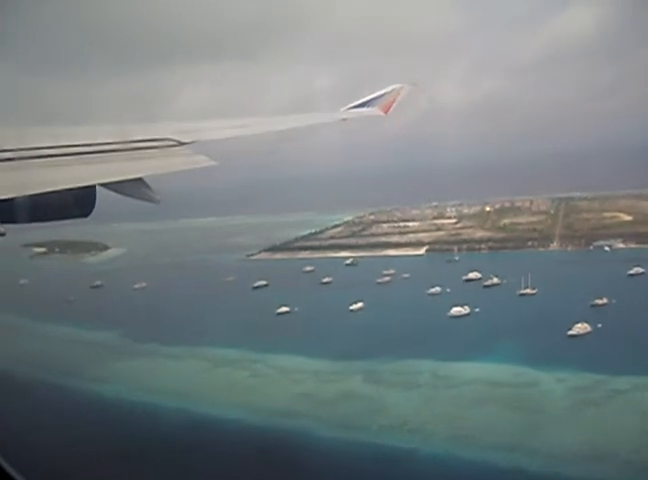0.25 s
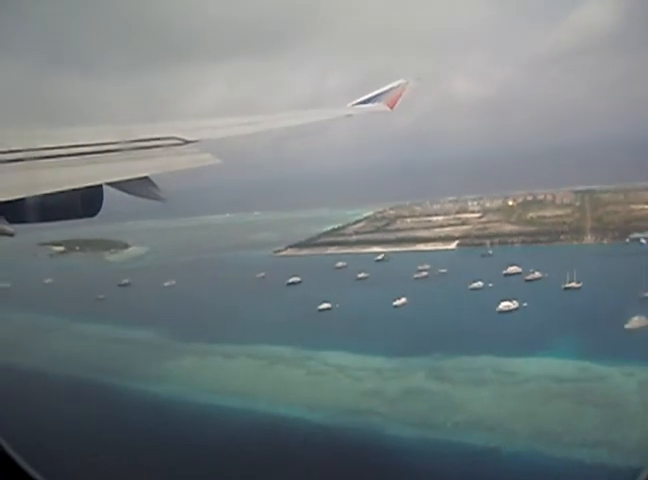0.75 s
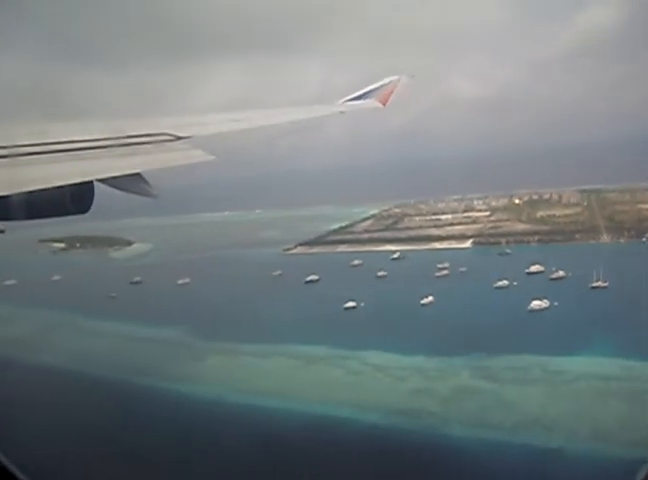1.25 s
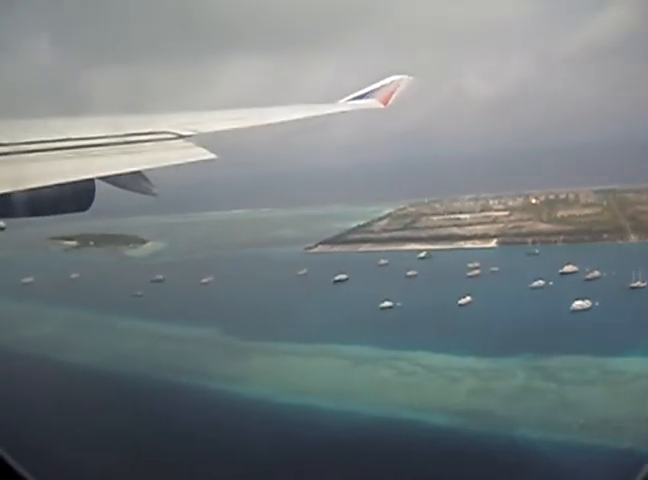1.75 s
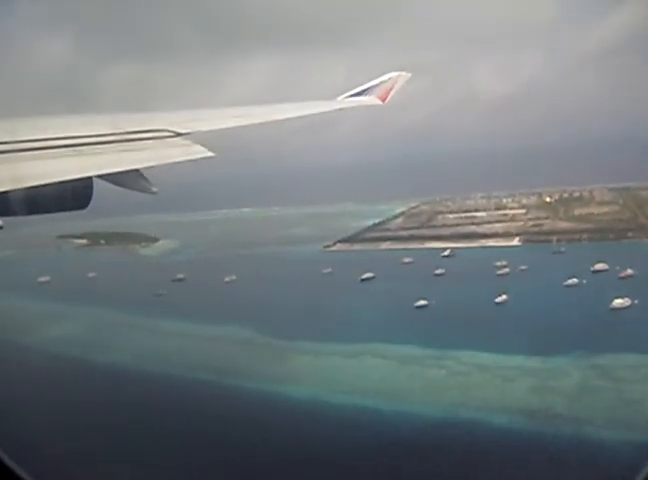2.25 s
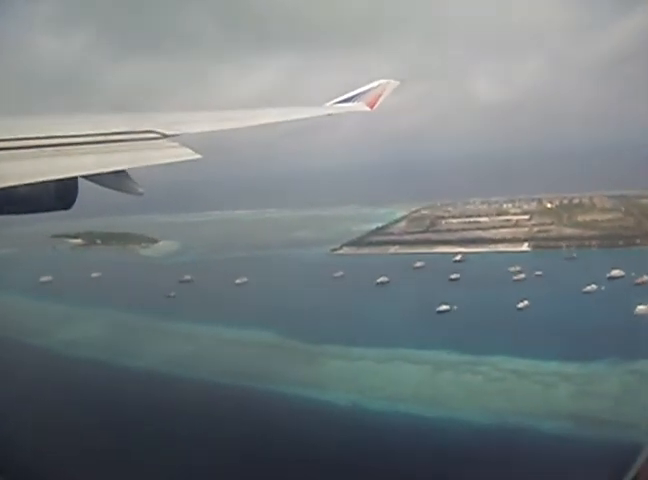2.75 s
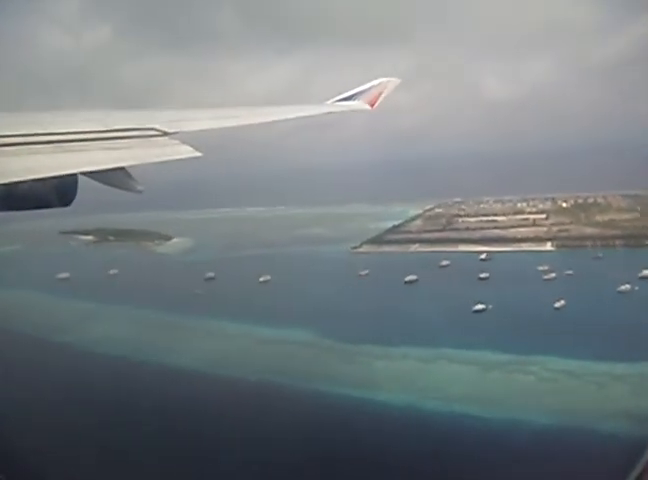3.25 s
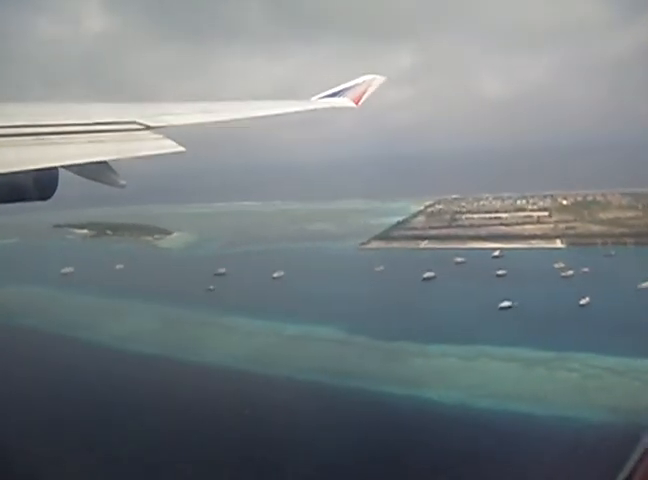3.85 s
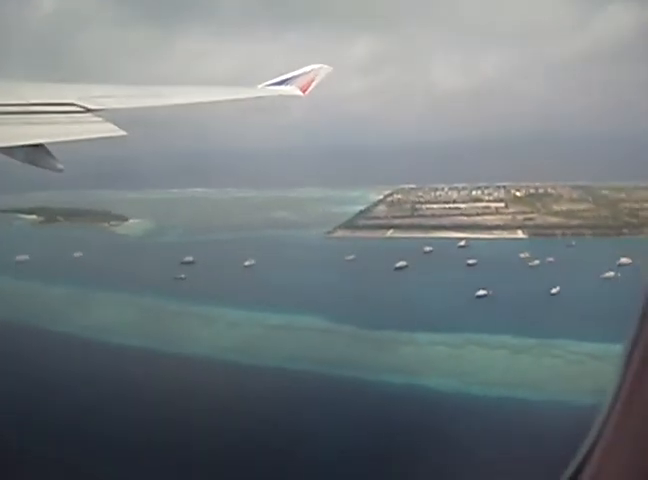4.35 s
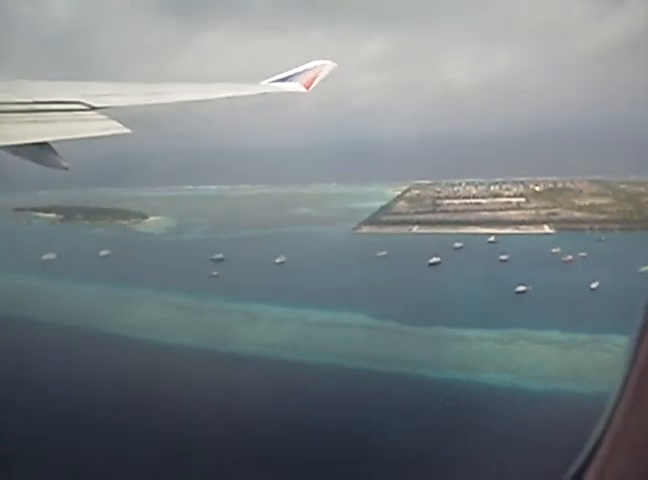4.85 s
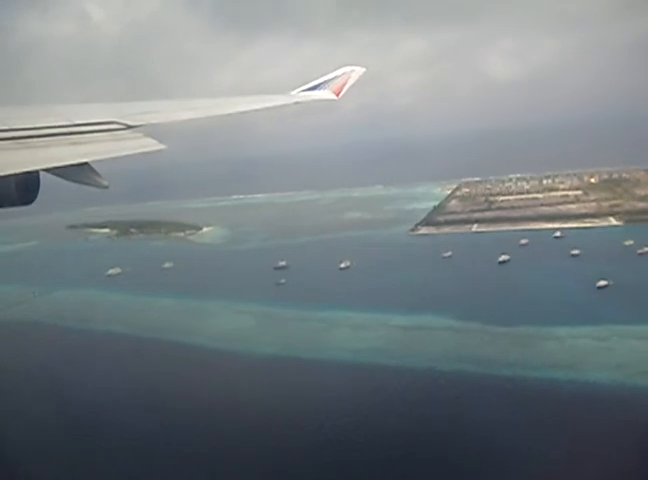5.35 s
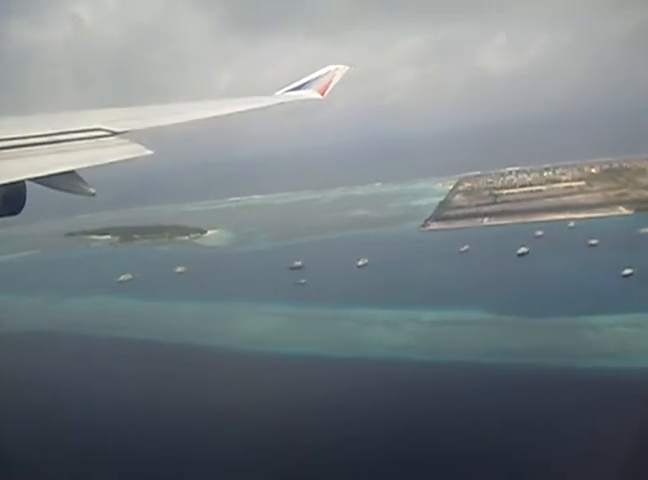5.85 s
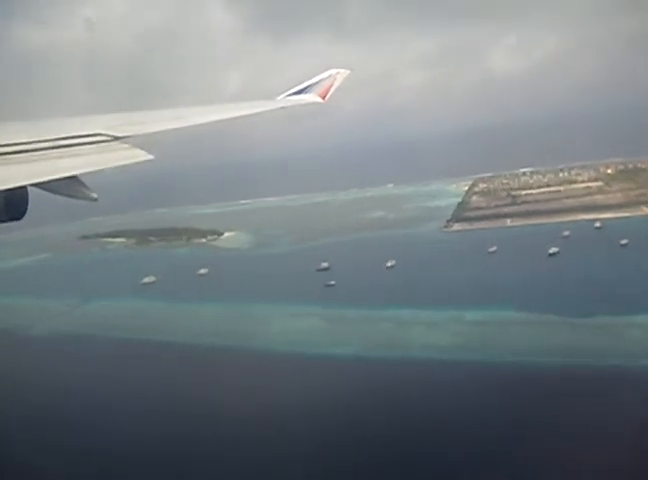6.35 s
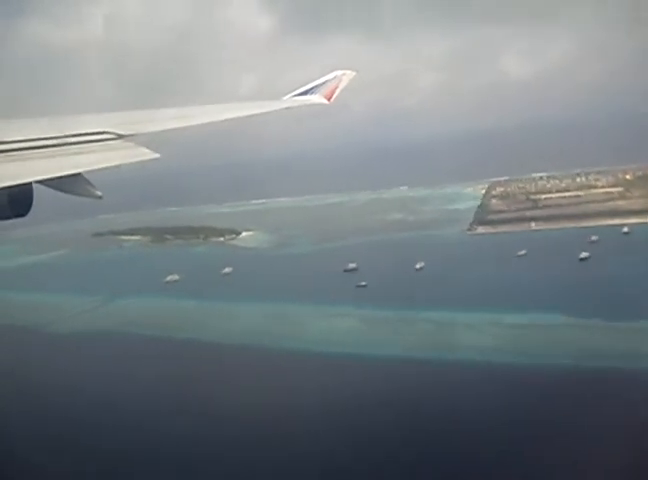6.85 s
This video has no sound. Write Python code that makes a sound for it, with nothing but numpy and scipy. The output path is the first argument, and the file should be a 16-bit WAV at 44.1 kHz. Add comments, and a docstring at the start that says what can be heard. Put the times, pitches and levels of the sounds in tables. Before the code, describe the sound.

The sound is a continuous airliner cabin roar heard beside a window while climbing over water, lasting about 7 seconds. Deep exhaust rumble and boomy wall panel vibration dominate, mostly below 200 Hz, with duller rushing air around 300 Hz and slight slow random swells but no overall change. Faint wavering engine tones are buried within it, and a quiet vent hiss sits far above. From 0 to 0.2 s a small camera motor whirs, with little ringing knocks at about 0.15, 0.18 and 0.2 s; it stops quickly, followed near 0.3 s by a weak knock and soft treble puff. Afterwards thin gritty hiss flutters with the rumble, and faint dry ticks repeat about eleven times a second. Sharper ticks stand out irregularly, for example near 1.0, 1.2, 3.2, 3.5, 4.4, 5.3 and 6.2 s. The roar is still going at the end.

```python
"""Airliner cabin on climb-out

Close to a window, jet roar booms through the fuselage, air rushes along the skin and out of the vents (shaped
noise), and engine tones waver faintly (narrow noise bands). A small camera motor whirs and stops at the start
(fading noise and decaying rings). Thin treble grit rises with the slope of the roar (modulated noise), with
sharper ticks on a steady beat and louder ones at listed times (filtered impulses)."""
import sys
import numpy as np
from scipy import signal
from scipy.fft import rfft, irfft, next_fast_len
from scipy.io import wavfile
from scipy.ndimage import uniform_filter1d, minimum_filter1d, map_coordinates

SR = 44100
rng = np.random.default_rng(int(sys.argv[2]) if len(sys.argv) > 2 else 0)


def put_to_file(sound):
    """Save the sound as 16-bit audio at rate SR, in the file named by the first command-line argument."""
    columns = np.atleast_2d(sound).T  # one column per channel
    safe = np.clip(columns, -1, 1)
    whole_steps = np.round(safe * 32767)
    wavfile.write(sys.argv[1], SR, whole_steps.astype(np.int16))


N = 312072

# In every spectrum only the shape counts: the noise is brought to rms 1 afterwards.
# Exhaust through the airframe: pitch_hz, relative level_db
EXHAUST_SPECTRUM = [(9, -54), (20, -22), (30, -14), (42, -8), (54, -2.5), (65, -2.5), (80, -2.5), (100, 1),
                    (130, -31.5), (220, -120)]
# Cabin wall panels: pitch_hz, relative level_db
PANEL_SPECTRUM = [(53, -16.5), (90, -8), (124, 1), (184, 0.5), (270, -11), (350, -36), (590, -120)]
# Boundary layer on the skin: pitch_hz, relative level_db
SKIN_FLOW_SPECTRUM = [(150, -39.5), (250, -5), (313, 1), (356, -7.5), (389, -6), (536, -16), (698, -21.5),
                      (775, -21.5), (1130, -33), (1500, -37.5), (1700, -52), (2210, -74.5), (3740, -120)]
# Overhead air vents: pitch_hz, relative level_db
VENT_SPECTRUM = [(940, -29.5), (1600, -4), (1760, -3.5), (1990, 0.5), (2350, -6.5), (2580, -5),
                 (3070, -10.5), (3670, -9), (5000, -19.5), (6500, -36.5), (11000, -120)]
# Engine tone centres: pitch_hz
ENGINE_TONE_HZ = [76, 116, 387, 770, 1065, 1300, 1471, 2031, 4172, 7853]
# Engine tone bands, one per centre: full width_hz at half amplitude, rms level_db
ENGINE_TONE_BANDS = [(12, -29), (13.9, -28.5), (20.2, -42.5), (40, -57.5), (10, -67.5), (10, -74),
                     (14, -67), (8, -73.5), (6, -81), (6, -84.5)]
# Gear noise through the camera body: pitch_hz, relative level_db
GEAR_SPECTRUM = [(900, -65), (1350, -11), (1780, -4), (2130, -3.5), (2500, -11.5), (2950, -11), (3270, -6),
                 (3700, -12), (4250, -14), (4750, -11), (6000, -15.5), (6600, -20), (7100, -15),
                 (11000, -38)]
# Upper resonances of the camera body: pitch_hz, half_width_hz, relative level_db
BODY_RESONANCES = [(2210, 150, -4), (3250, 250, 0), (4000, 250, -2), (4550, 180, -11)]
# Motor knocks: start_s, level_db, t60_s, ring pitch_hz, upper rings' level_db, phase step_rad per sample
KNOCKS = [(.151, -30, .028, 1770, -1, .03), (.175, -30, .04, 1850, -6, .04),
          (.203, -38, .08, 1870, -8, .02), (.32, -45, .06, 2400, -9, .25)]
# Treble grit and ticks: pitch_hz, relative level_db
GRIT_SPECTRUM = [(1200, -120), (2000, -7), (4000, 1), (6000, 1), (8000, 0), (10000, -2.5), (10800, -6),
                 (11400, -13.5), (12000, -26), (12300, -120)]
# The loudest ticks: start_s, impulse level_db
LOUD_TICKS = [(.3173, -38), (.5944, -37), (.9638, -32), (.9945, -37), (1.2265, -33.5), (1.6102, -36),
              (2.9953, -37), (3.0876, -36), (3.18, -34.5), (3.5494, -33), (3.9186, -35), (4.021, -39),
              (4.3802, -33), (4.4541, -40), (4.5649, -39), (5.3036, -34), (5.5806, -35), (6.227, -31.5),
              (6.4117, -35)]

EXHAUST_DB, PANEL_DB, SKIN_FLOW_DB = -24, -19.5, -29.5  # middle levels of the three ranges of the roar
SWELL_DB, SWELL_PER_S = 0.75, 1.573  # depth and pace of their slow random swells
VENT_DB, GRIT_DB = -57.5, -61.5
MOTOR_DB, SAG_DB_PER_S = -45.5, 20  # level at first, steady fall throughout
MOTOR_OFF_S, RUNDOWN_DB_PER_S = .195, 330  # switch-off, extra fall after it
PUFF_S, PUFF_WIDE_S, PUFF_DB = .312, 0.015, -54  # treble puff: centre, standard deviation, peak of its envelope
BEAT_S, FIRST_BEAT_S = .092336, .0402  # period and first of the faint ticks
BEAT_DB, BEAT_SPREAD_DB = -44, 2  # their usual impulse level and its scatter
FLICKER_DB, FLICKER_PER_S = .7, 36  # random flicker of the treble hiss
TOP_HZ = 12300  # band limit of the whole sound
CEILING_DB = -5.5  # limiter threshold


def amp(db):
    """Level law: decibels to amplitude gain."""
    return 10 ** (np.asarray(db) / 20)


def unit(x):
    """Power normalisation: scale to rms 1."""
    return x / np.sqrt(np.mean(x ** 2) + 1e-20)


def wobble(rate):
    """Spline interpolation: a smooth random curve with rate knots a second (4000 at most)."""
    knots = rng.standard_normal(int(N * 4000 / SR) + 4)
    return map_coordinates(knots, [np.arange(N) * min(rate, 4000) / SR])


def filtered(x, response):
    """Linear filtering: multiply the spectrum by a response of frequency."""
    m = next_fast_len(N + SR // 2)
    hz = np.fft.rfftfreq(m, 1 / SR)
    return irfft(rfft(x, m) * response(hz), m)[:N]


def coloured(x, spectrum):
    """Spectral shaping: interpolate the level in decibels along a log-frequency axis."""
    f, db = np.transpose(spectrum)
    return filtered(x, lambda hz: amp(np.interp(np.log(hz + 1), np.log(f + 1), db)))


def noise(spectrum, patchy_db):
    """Modulated noise: random gain patches in time and frequency, then a spectral shape, at rms 1."""
    cells = signal.stft(rng.standard_normal(N + 512), nperseg=512)[2]
    field = rng.standard_normal(cells.shape)
    field = uniform_filter1d(field, size=5, axis=0)  # along frequency
    field = uniform_filter1d(field, size=12, axis=1)  # along time
    patchy = signal.istft(cells * amp(patchy_db * unit(field)), nperseg=512)[1][:N]
    return unit(coloured(patchy, spectrum))


def roar():
    """Transmission through a fuselage: exhaust, panel boom and skin airflow swell independently."""
    def swell(db):
        """Slow random modulation: a gain that wanders about a level."""
        return amp(db + SWELL_DB * wobble(SWELL_PER_S))

    exhaust = swell(EXHAUST_DB) * noise(EXHAUST_SPECTRUM, patchy_db=0.8)
    panels = swell(PANEL_DB) * noise(PANEL_SPECTRUM, patchy_db=-0.18)
    skin_flow = swell(SKIN_FLOW_DB) * noise(SKIN_FLOW_SPECTRUM, patchy_db=0.37)
    return exhaust + panels + skin_flow


def vents():
    """Flow noise: cabin air issues as a broad hiss with a constant mean level."""
    return amp(VENT_DB) * noise(VENT_SPECTRUM, patchy_db=1.0)


def engine_tones():
    """Line broadening: engines at slightly different speeds blur each shaft or blade tone into a band."""
    def band(centre_hz, half_width_hz):
        """Resonance curve: white noise narrowed around one frequency."""
        white = rng.standard_normal(N)
        return unit(filtered(white, lambda f: 1 / (1 + ((f - centre_hz) / half_width_hz) ** 2)))

    tones = np.zeros(N)
    for pitch_hz, (width_hz, level_db) in zip(ENGINE_TONE_HZ, ENGINE_TONE_BANDS):
        tones += amp(level_db) * band(pitch_hz, width_hz / 2)
    return tones


def camera_motor():
    """Forced and free vibration: gear noise fades out while short knocks ring the camera body."""
    clock = np.arange(N) / SR
    level_db = MOTOR_DB - SAG_DB_PER_S * clock - RUNDOWN_DB_PER_S * np.maximum(clock - MOTOR_OFF_S, 0)
    out = amp(level_db) * noise(GEAR_SPECTRUM, patchy_db=.3)
    t, hz = np.arange(4096) / SR, np.fft.rfftfreq(4096, 1 / SR)
    body = sum(amp(db) / (1 + ((hz - centre) / half_width) ** 2) for centre, half_width, db in BODY_RESONANCES)
    for start_s, db, t60, ring_hz, upper_db, scatter in KNOCKS:
        burst = unit(irfft(rfft(rng.standard_normal(len(t))) * body))
        upper = amp(upper_db - 40 * t / t60) * burst  # dies faster than the main ring
        phase_drift = np.cumsum(abs(scatter) * rng.standard_normal(len(t)))
        ring = np.sin(2 * np.pi * ring_hz * t + phase_drift)
        envelope = amp(db - 60 * t / t60) * (1 - np.exp(-t / 0.0016))  # 1.6 ms rise
        out[round(start_s * SR):][:len(t)] += envelope * (ring + upper)
    return out


def ticks():
    """Impulse response: kicks, regular and listed, sound the treble band as sharp ticks."""
    kicks, beats = np.zeros(N), np.arange(FIRST_BEAT_S, N / SR, BEAT_S)
    scatter_db = BEAT_SPREAD_DB * rng.standard_normal(len(beats)).clip(-3, 1)
    kicks[(beats * SR).astype(int)] = amp(BEAT_DB + scatter_db)
    for start_s, level_db in LOUD_TICKS:
        at = round(start_s * SR)
        kicks[at - 40:][:80] = 0  # a loud tick replaces any faint one beside it
        kicks[at] = amp(level_db)
    rung = coloured(kicks, GRIT_SPECTRUM)
    return rung * kicks.max() / rung.max()  # the highest peak keeps its level


def grit(wave):
    """Slope-driven modulation: treble hiss grows in uneven spurts with wave steepness, plus a puff and ticks."""
    steep = unit(np.gradient(wave))
    spurts = amp(1.6 * wobble(900))
    growth = np.sqrt(1 + 0.65 * np.abs(steep) ** 2.7 * spurts ** 2)
    drive = growth * rng.standard_normal(N)
    from_puff = (np.arange(N) / SR - PUFF_S) / PUFF_WIDE_S
    puff = amp(PUFF_DB) * np.exp(-.5 * from_puff ** 2)
    flicker = amp(GRIT_DB + FLICKER_DB * wobble(FLICKER_PER_S))
    level = np.hypot(flicker, puff)  # powers add
    hiss = level * unit(coloured(drive, GRIT_SPECTRUM))
    return hiss + ticks()


def scene():
    """Superposition: cabin, engines, camera and grit add linearly."""
    low = roar()
    return (low + vents() + engine_tones() + camera_motor() + grit(low))[None]


def record(dry):
    """Peak limiting and band limiting: gain eases down around the tallest swings, then the top is cut."""
    needed = np.minimum(1, amp(CEILING_DB) / (np.abs(dry[0]) + 1e-9))
    held = minimum_filter1d(needed, size=901)
    gain = uniform_filter1d(uniform_filter1d(held, size=450), size=450)
    return filtered(dry[0] * gain, lambda hz: hz < TOP_HZ)[None]


dry = scene()
out = record(dry)
put_to_file(out)
```